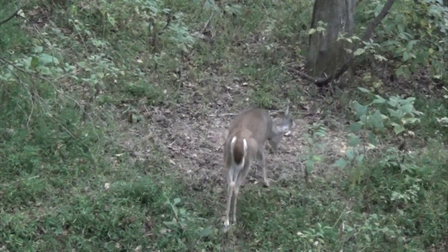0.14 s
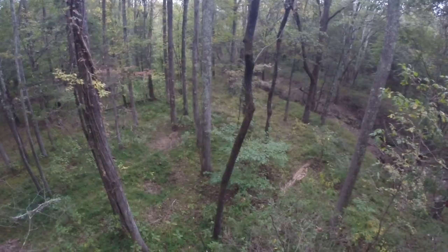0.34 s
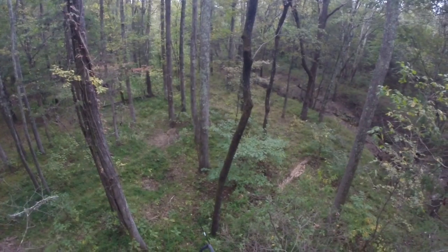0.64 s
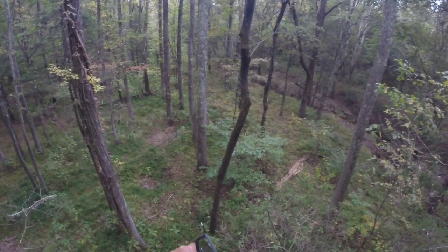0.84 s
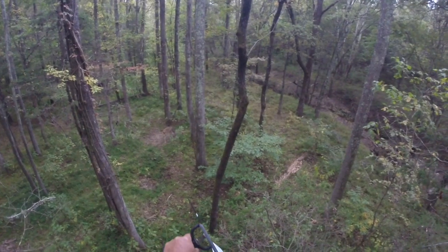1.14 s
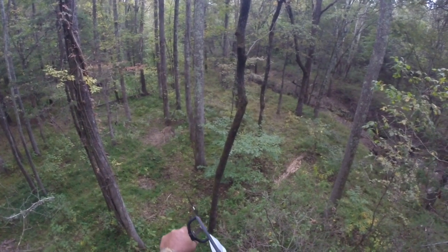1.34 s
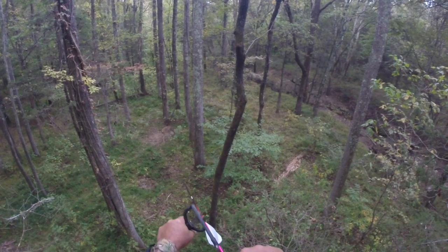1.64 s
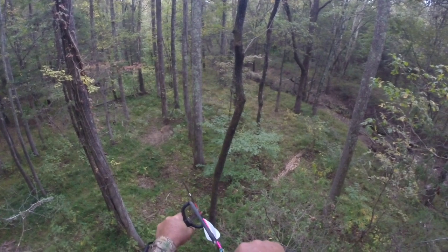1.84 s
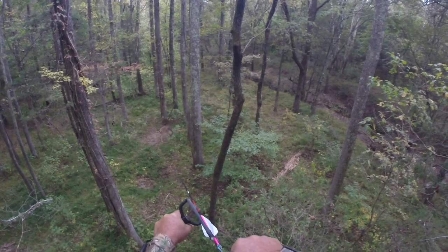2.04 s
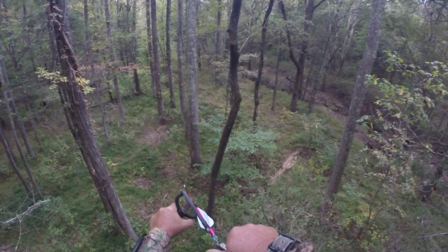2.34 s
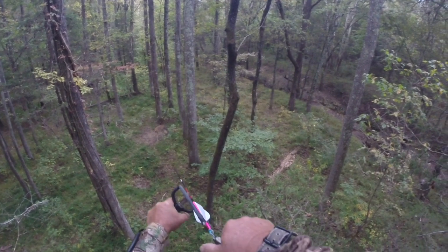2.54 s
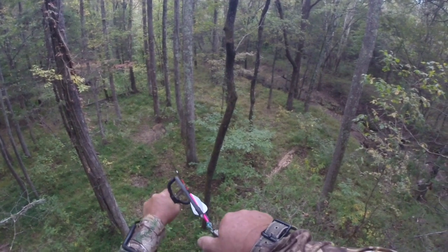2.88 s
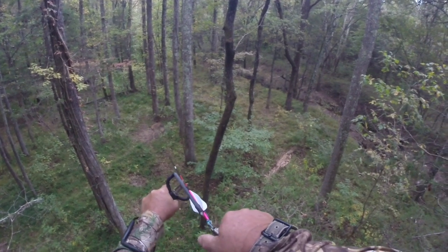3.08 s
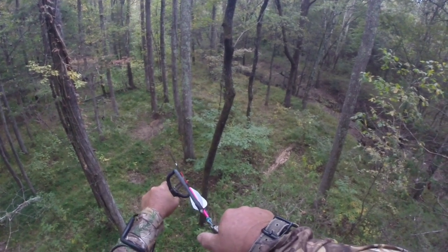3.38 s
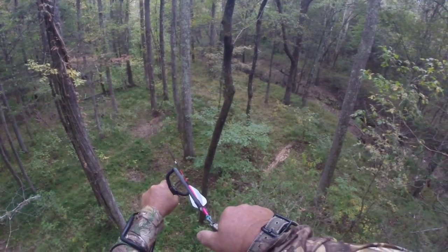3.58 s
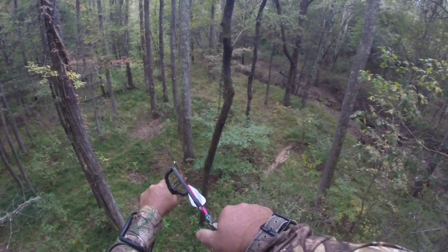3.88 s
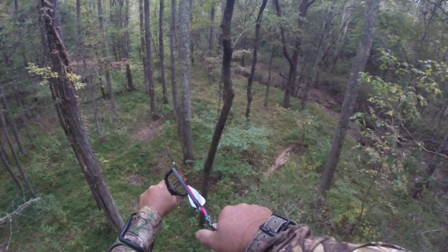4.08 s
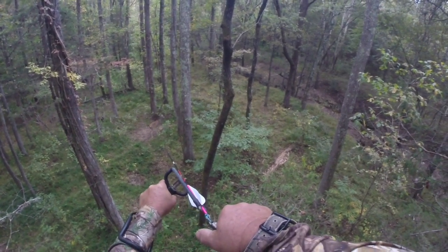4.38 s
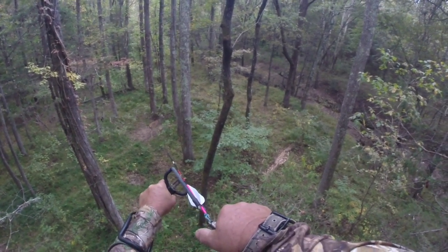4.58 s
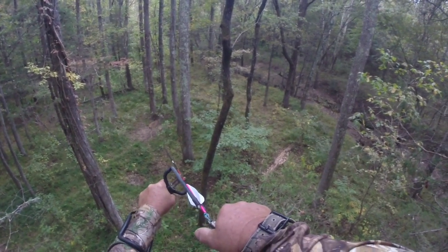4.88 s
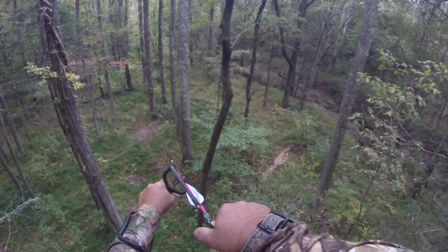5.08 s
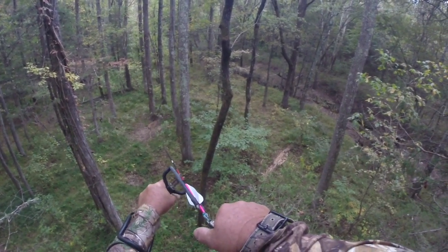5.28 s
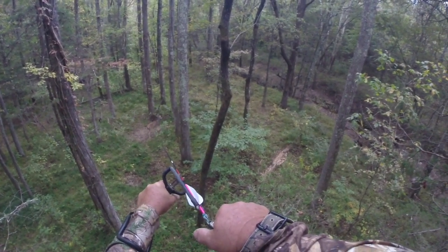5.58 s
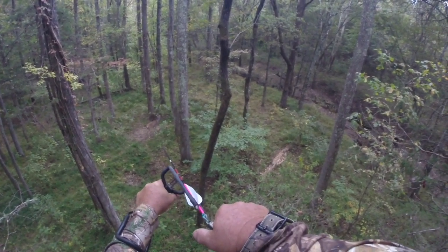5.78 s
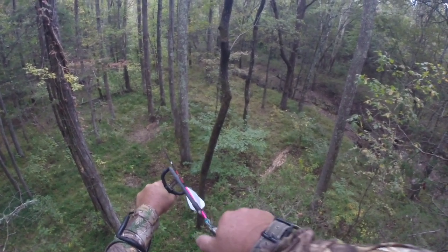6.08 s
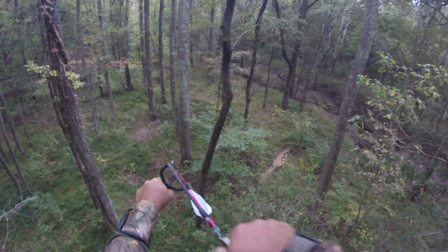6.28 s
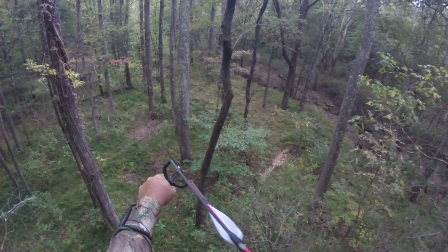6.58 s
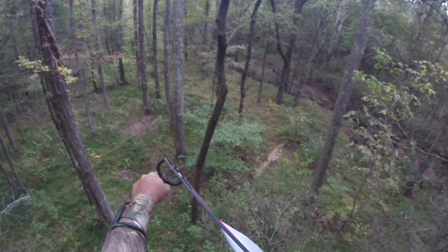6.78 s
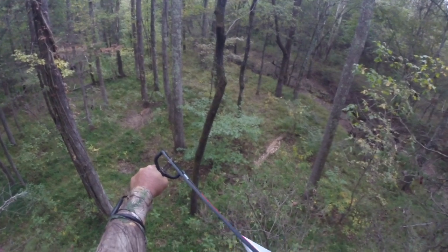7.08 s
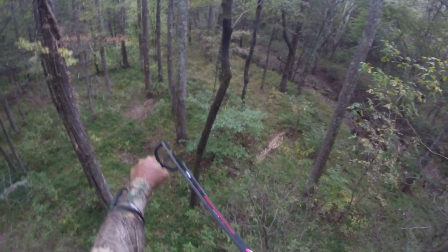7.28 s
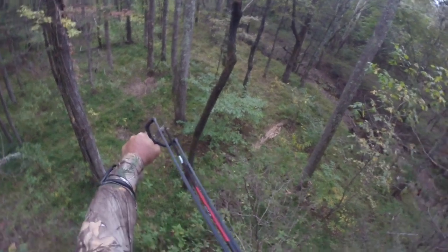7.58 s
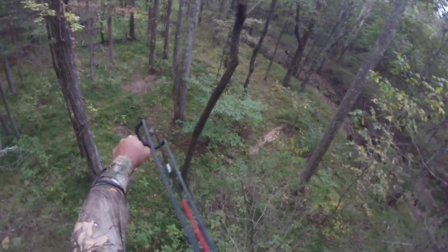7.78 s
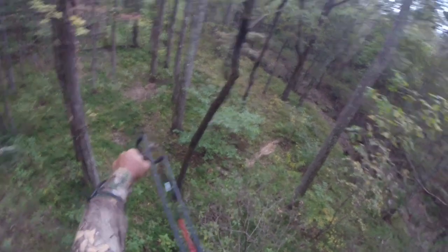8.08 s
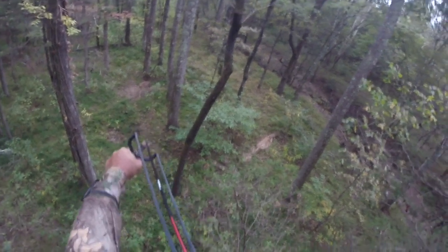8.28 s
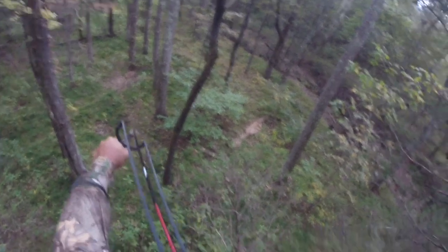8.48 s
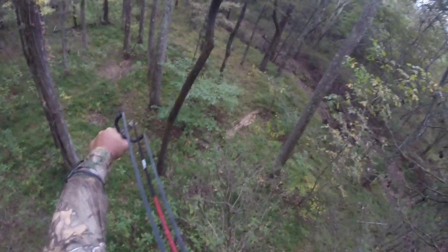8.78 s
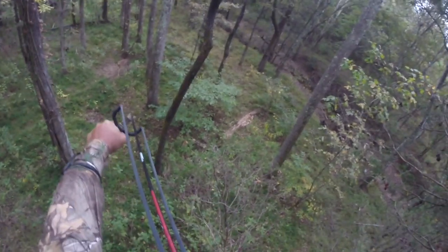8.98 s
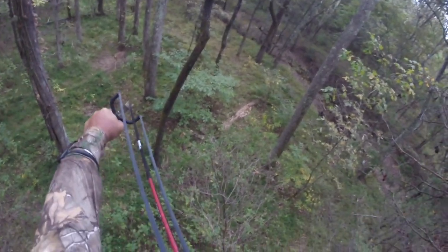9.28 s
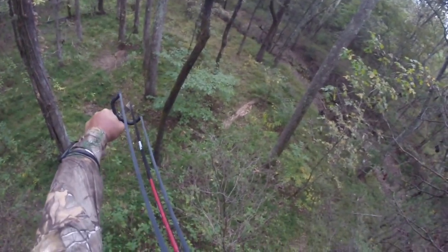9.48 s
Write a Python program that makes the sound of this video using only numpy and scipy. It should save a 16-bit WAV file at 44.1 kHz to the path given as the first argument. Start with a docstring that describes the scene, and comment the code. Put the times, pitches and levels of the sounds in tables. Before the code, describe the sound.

A quarter-second burst of loud insect chorus drops abruptly to quiet woods with faint chirping crickets, then low rumble and soft knocks as a bow is drawn.

```python
"""Autumn woods. For a quarter second a loud stereo chorus of insects, made of throbbing noise bands, wing tones and
rasps, covers a beating far engine drone. It then fades quickly to a quiet mono body-worn microphone up a tree: soft
forest air of shaped noise, two field crickets, a third pipping and others far off, all built from ringing syllables,
faint katydids of throbbing and ticking noise under an unsteady treble hiss, and a far whistled bird. Towards the end
the archer draws a sling bow and the movement comes through the mount as deep noise and low knocks."""
import sys
import numpy as np
from scipy import signal
from scipy.fft import rfft, irfft, next_fast_len
from scipy.io import wavfile
from scipy.ndimage import uniform_filter1d

SR = 44100
rng = np.random.default_rng(int(sys.argv[2]) if len(sys.argv) > 2 else 0)


def transcribe(signal):
    """Save signal, clipped to [-1, 1], as a 16-bit WAV file at the path in sys.argv[1]."""
    frames = np.atleast_2d(signal).T
    limited = np.clip(frames, -1, 1)
    pcm = np.round(limited * 32767).astype(np.int16)
    wavfile.write(sys.argv[1], SR, pcm)


N = 425124
TIME = np.arange(N) / SR
CUT_S, FADE_S = 0.2495, 0.014   # start and length of the fade from chorus to woods


def from_db(db):
    """Decibels to gain."""
    return 10 ** (np.asarray(db) / 20)


def rms_one(x):
    """Scale to unit power."""
    return x / np.sqrt(np.mean(x ** 2) + 1e-20)


def level(rows):
    """Gain along a curve of (s, dB)."""
    return from_db(np.interp(TIME, *np.transpose(rows)))


def at_hz(points, hz):
    """Read a curve on a log-frequency axis."""
    f, value = np.transpose(points)
    return np.interp(np.log(hz + 1e-9), np.log(f), value)


def noise(shape):
    """Noise of unit power, coloured by the gain shape(hz)."""
    size = next_fast_len(N)
    hz = np.arange(size // 2 + 1) * SR / size
    spectrum = rfft(rng.standard_normal(size)) * shape(hz)
    return rms_one(irfft(spectrum, size)[:N])


def drift(rate):
    """Slow random wander of unit power, mostly below rate in Hz."""
    return noise(lambda f: 1 / (1 + (f / rate) ** 2))


def band(hz, width):
    """Noise in a resonance with sloping skirts."""
    return noise(lambda f: 1 / np.sqrt(1 + (2 * (f - hz) / width) ** 4))


def swell(centre, length):
    """A smooth rise and fall of height 1."""
    out = np.zeros(N)
    a, b = np.searchsorted(TIME, [centre - length / 2, centre + length / 2])
    out[a:b] = np.cos(np.pi * (TIME[a:b] - centre) / length) ** 2
    return out


def add(out, s, sound):
    """Mix a short sound in at time s."""
    i = int(np.clip(round(s * SR), 0, N))
    out[i:i + len(sound)] += sound[:N - i]


def low_pass(x, hz):
    """Steep top cut."""
    return signal.sosfilt(signal.ellip(12, .1, 70, hz, fs=SR, output="sos"), x)


def strokes(per_s, depth_db, unsteady):
    """Throb, as of wings opening and closing, at a wandering rate; depth is the rms swing of the level."""
    rate = per_s * (1 + unsteady * drift(12.0))
    phase = 2 * np.pi * np.cumsum(rate) / SR
    return rms_one(from_db(np.sqrt(2) * depth_db * np.sin(phase)))


def syllable(hz, length, rise_hz, arch_hz):
    """One wing closure: the file's speed bends the pitch of the ringing wing."""
    u = np.linspace(-1, 1, int(length * SR))   # from start to end of the closure
    pitch = hz + rise_hz * u - arch_hz * u ** 2 + rng.normal(0, 19)
    envelope = np.sqrt(1 - u ** 2) * np.cos(u)
    return envelope * np.sin(2 * np.pi * (np.cumsum(pitch) / SR + rng.random()))


def trees(x, wet_db, t60):
    """Trunks and leaves scatter a thin dying tail."""
    t = TIME[:SR // 2]
    tail = rng.standard_normal(len(t)) * from_db(-60 * t / t60) * (t > .003)
    echo = signal.fftconvolve(x, tail / np.linalg.norm(tail))[:N]
    return x + from_db(wet_db) * echo


def stereo(mid, side, likeness):
    """Two unrelated sounds make a pair of the given likeness."""
    alike = np.clip(likeness, -1, 1)
    return np.sqrt((1 + alike) / 2) * mid + np.sqrt((1 - alike) / 2) * side * np.array([[1], [-1]])


def opening_air():
    """Broad air noise, alike in both ears or spread apart according to frequency."""
    # Colour of the air. Each row: frequency in Hz, relative density in dB per Hz.
    colour = [(25, -19), (60, -13), (115, -0.5), (220, -2), (350, -10), (700, -14), (1400, -17.5),
              (3800, -19), (8000, -14), (10400, -15), (11500, -22), (15500, -23.5)]
    # Stereo width of the air. Each row: frequency in Hz, left-right likeness from 0 to 1.
    likeness = [(130, 0.986), (290, 0.81), (640, .08), (1400, .02), (3100, .45), (7000, 1), (12000, 1)]

    def side_gain(f):
        alike = np.clip(at_hz(likeness, f), 0, 1)
        return from_db(at_hz(colour, f)) * np.sqrt((1 - alike) / (1 + alike))

    mid = noise(lambda f: from_db(at_hz(colour, f)))
    side = noise(side_gain)
    return from_db(-43.5) * mid + from_db(-52.0) * side * np.array([[1], [-1]])


def engine():
    """A far drone that swells and sinks in slow beats while its pitch wavers."""
    drone_hz, peak_db, beat_s = 161.5, -42, 0.144
    beats = np.abs(np.sin(np.pi * TIME / beat_s))
    pitch = drone_hz + 1.5 * drift(13.7)
    return from_db(peak_db) * beats * np.sin(2 * np.pi * np.cumsum(pitch) / SR)


def trillers():
    """Steady trilling crickets: near-pure wing tones throbbing at their syllable rates."""
    # One cricket each row: pitch in Hz, rms level in dB, syllables per second.
    trills = [(2960, -62, 45), (4570, -51.5, 61), (4940, -51.5, 52), (4960, -53, 43), (5650, -61, 60)]
    out = 0
    for hz, db, per_s in trills:
        pitch = hz + 10 * drift(30)
        tone = np.sqrt(2) * np.sin(2 * np.pi * np.cumsum(pitch) / SR)
        out = out + from_db(db) * tone * strokes(per_s, 2.9, 0.044)
    return out


def wing_chorus():
    """Massed wings: resonant noise bands, each throbbing at its stroke rate with its own stereo width."""
    # Each row: centre in Hz, width in Hz, level in dB, wing strokes per second,
    # rms throb depth in dB (the sign sets the phase), left-right likeness.
    wing_bands = [(2960, 220, -59, 45, -1, 0.75), (4640, 320, -46.5, 60, -5, 0.55),
                  (5000, 460, -41, 50, 1, 0.82), (5480, 370, -43, 88, 5, 1), (6000, 450, -54.5, 79, 2, .8),
                  (6570, 390, -40, 85, 0.5, 0.88), (6970, 330, -37.5, 88, 1, 0.94),
                  (7330, 530, -46, 36, 9, 0.92)]
    out = 0
    for hz, width, db, per_s, depth_db, likeness in wing_bands:
        wings = band(hz, width)
        # the same noise played backwards is unrelated to it
        out = out + from_db(db) * stereo(wings, wings[::-1], likeness) * strokes(per_s, depth_db, 0.204)
    return out


def rasps():
    """Short falling wing strokes of the nearest katydid, evenly spaced and uneven in strength."""
    first_s, period_s = .0115, 0.023
    pitch_hz, peak_db, spread_db = 6960, -28.5, 2
    out = np.zeros(N)
    for s in np.arange(first_s, CUT_S, period_s):
        gain = from_db(rng.normal(peak_db, spread_db))
        stroke = syllable(rng.normal(pitch_hz, 110), 0.0053, -220, 60)
        add(out, s - .003, gain * stroke)   # the stroke is about centred on s
    return out


def opening():
    """A dense chorus with close rasps and one cricket syllable, over air and a far engine."""
    close = rasps()
    add(close, 0, from_db(-28.5) * syllable(4990, .016, -50, 60))
    insects = trillers() + wing_chorus() + close
    lean_right = from_db([[-.45], [.45]])
    return opening_air() + engine() + insects * lean_right


def forest_air():
    """A smooth wash of far leaves and distance, its level wavering very slightly."""
    # Colour of the air. Each row: frequency in Hz, relative density in dB per Hz.
    colour = [(20, 3.5), (45, 0), (80, -2.5), (160, -5), (300, -8.5), (550, -12), (1000, -16),
              (2000, -20.5), (4000, -26), (6000, -28), (8000, -34.5), (10500, -37.5), (12500, -40.5),
              (15500, -45)]
    wash = noise(lambda f: from_db(at_hz(colour, f)) * f / np.hypot(f, 14))
    return from_db(-55.0) * wash * from_db(0.09 * drift(6.8))


def keenness():
    """Gain of the pipper and the katydid trills as they grow a little keener."""
    calm_db, keen_db = -.5, 1
    start_s, rise_s = 6, 1.6
    return level([(start_s, calm_db), (start_s + rise_s, keen_db)])


def cricket(chirps, period, length, rise_hz, arch_hz, start_db, start_hz, uneven_db):
    """Chirps are trains of uneven syllables; the first ones are offset in level and lower in pitch."""
    out = np.zeros(N)
    for s, count, hz, db in chirps:
        for k in range(int(round(count))):
            onset = np.exp(-2 * k)   # 1 on the first syllable, soon gone
            gain = from_db(db + start_db * onset + rng.normal(0, uneven_db))
            add(out, s + k * period, gain * syllable(hz - start_hz * onset, length, rise_hz, arch_hz))
    return out


def pipper():
    """Single syllables in strict time, each a little different in pitch and strength."""
    first_s, period_s, length_s = .4276, .31286, .017
    pitch_hz, pitch_spread_hz = 5450, 45
    peak_db, spread_db = -64.5, 0.5   # before keenness
    out = np.zeros(N)
    for s in np.arange(first_s, TIME[-1], period_s):
        gain = from_db(rng.normal(peak_db, spread_db))
        add(out, s, gain * syllable(rng.normal(pitch_hz, pitch_spread_hz), length_s, -23, 15))
    return out * keenness()


def crickets():
    """Two chirping neighbours, one steady pipper and chirps from far off that come with more echo."""
    # Three singers: arched syllables, rising syllables, and far chirps blurred by the trees.
    # Each row: start in seconds, number of syllables, pitch in Hz, nominal peak level in dB.
    arched_chirps = [(.258, 10, 4960, -58), (1.585, 10, 5030, -57.5), (3.047, 10, 4950, -57.5),
                     (4.795, 10, 4990, -56.5), (6.450, 10, 5000, -59), (7.686, 10, 5000, -58),
                     (9.025, 10, 4965, -59.5)]
    rising_chirps = [(.960, 11, 4760, -58), (2.558, 11, 4760, -58), (4.212, 9, 4800, -58.5),
                     (6.524, 10, 4750, -59), (8.234, 11, 4750, -58.5)]
    far_chirps = [(0.799, 11, 4980, -62), (1.97, 11, 4900, -71), (3.262, 13, 5050, -64),
                  (3.889, 11, 4940, -67), (5.28, 10, 5050, -68), (5.5, 11, 5100, -67),
                  (6.847, 12, 4960, -66.5), (7.149, 12, 4880, -70), (7.357, 12, 5060, -66),
                  (7.9, 14, 4710, -73), (8.912, 10, 5030, -65), (9.276, 11, 4970, -67)]
    arched = cricket(arched_chirps, period=.0187, length=0.012, rise_hz=-35, arch_hz=100,
                     start_db=-2.0, start_hz=70, uneven_db=0.7)
    rising = cricket(rising_chirps, period=.0201, length=0.011, rise_hz=140, arch_hz=-30,
                     start_db=-2.5, start_hz=70, uneven_db=1.2)
    far = cricket(far_chirps, period=.0194, length=0.014, rise_hz=-92, arch_hz=40,
                  start_db=1, start_hz=20, uneven_db=2.0)
    near = arched + rising + pipper()
    return trees(near, wet_db=-8, t60=0.25) + trees(far, wet_db=-3, t60=.2)


def tick_rows():
    """The clear ticks, and weaker ones at random wherever the wings have had their rest."""
    # Clearest ticks of a high katydid. Each row: time in seconds, nominal peak level in dB.
    clear_ticks = [(1.1751, -63), (2.2811, -64), (2.4058, -62), (3.7806, -63), (4.281, -64), (5.5322, -65),
                   (6.1797, -61), (6.2855, -63), (6.4635, -60), (7.807, -62), (8.2435, -60), (8.3453, -62),
                   (8.4989, -62), (9.585, -60)]
    tries_per_s, weak_db, rest_s = 9.4, -65, .07
    rows = list(clear_ticks)
    for s in rng.uniform(CUT_S, TIME[-1], int(tries_per_s * TIME[-1])):
        if all(abs(s - other) > rest_s for other, db in rows):
            rows.append((s, weak_db))
    return rows


def katydids():
    """Far trills merge into throbbing bands; a nearer one ticks; over them lies a faint, unsteady top-treble hiss."""
    # Far insects. Each row: centre in Hz, width in Hz, level in dB before keenness,
    # wing strokes per second, rms throb depth in dB (the sign sets the phase).
    far_insects = [(5030, 533, -74, 52, -0.5), (5490, 290, -80, 37, 0.5), (6770, 790, -77, 37, 1),
                   (8450, 800, -95, 20, 7.5), (10250, 400, -88, 88, 10)]
    # Top-treble hiss. Each row: centre in Hz, width in Hz, level in dB before its unsteadiness.
    treble_bands = [(13300, 300, -82.5), (14700, 1300, -85)]
    trills = sum(from_db(db) * band(hz, width) * strokes(per_s, depth_db, 0.0089)
                 for hz, width, db, per_s, depth_db in far_insects)
    rows = tick_rows()
    unsteady = np.minimum(sum(swell(s + 0.027, 0.085) for s, db in rows), 1) ** .25
    treble = sum(from_db(db) * band(hz, width) for hz, width, db in treble_bands)
    treble_hiss = treble * (unsteady + .1) * strokes(105, 2, .05)
    # the noise peaks above its rms, so each tick is turned down by 4.5 dB
    tick_gain = sum(from_db(db - 4.5) * swell(s + .001, 0.0056) for s, db in rows)
    return trills * keenness() + treble_hiss + tick_gain * band(8800, 1100)


def bird():
    """A very distant bird: a few thin whistled notes, mostly echo."""
    # Each row: start in seconds, length in seconds, pitch in Hz, peak level in dB before the echo.
    whistles = [(0.59, 0.05, 3060, -71), (5.35, 0.08, 2948, -72.5), (5.43, .09, 3050, -74),
                (5.804, 0.15, 2950, -74.5)]
    notes = np.zeros(N)
    for s, length, hz, db in whistles:
        add(notes, s, from_db(db) * syllable(hz, length, 30, 42.3))
    return trees(notes, wet_db=1, t60=.3)


def draw_effort():
    """Gain of the shaking: it grows with the pull, holds at full draw, and eases off."""
    start_s, full_draw_s, hold_s = 5.8, 7.7, 0.88
    full_draw_db, strain_db_per_s, settle_db_per_s = -44, 9, 6
    strain_db = strain_db_per_s * np.minimum(TIME - full_draw_s, 0)
    settle_db = settle_db_per_s * np.maximum(TIME - full_draw_s - hold_s, 0)
    fade_in = np.clip((TIME - start_s) / .5, 0, 1)
    return from_db(full_draw_db + strain_db - settle_db) * fade_in


def mount():
    """Drawing the bands shakes the microphone: an even, deep rumble and a few soft knocks."""
    # Colour of the rumble. Each row: frequency in Hz, relative density in dB per Hz.
    colour = [(12, 3.5), (33, -1.5), (48, -5), (70, -14.5), (110, -23), (200, -28), (500, -64)]
    # Soft knocks and jolts. Each row: centre in seconds, pitch in Hz, peak level in dB, length in seconds.
    bumps = [(6.842, 28, -45, 0.14), (7.703, 26, -34, 0.068), (8.013, 102, -36, 0.043),
             (8.019, 54.7, -38, .09), (8.28, 28, -36, 0.082), (8.494, 29.8, -36, 0.11),
             (8.652, 24.4, -42, 0.22)]
    shake = noise(lambda f: from_db(at_hz(colour, f)) * f / np.hypot(f, 10) / (1 + (f / 600) ** 2))
    local_power = uniform_filter1d(shake ** 2, SR // 12)
    rumble = rms_one(shake / np.sqrt(local_power + .05))   # evens out the loudness
    knocks = sum(from_db(db) * swell(s, length) * -np.cos(2 * np.pi * hz * (TIME - s - .01))
                 for s, hz, db, length in bumps)
    return draw_effort() * rumble + knocks


def scene():
    """The loud stereo opening gives way to the quiet mono woods, whose top is cut a little lower."""
    woods = low_pass(forest_air() + crickets() + katydids() + bird() + mount(), 15300)
    after = np.clip((TIME - CUT_S) / FADE_S, 0, 1)
    return (1 - after) * opening() + after * woods


def record(dry):
    """The top is cut steeply at 15.8 kHz."""
    return low_pass(dry, 15800)


dry = scene()
out = record(dry)
transcribe(out)
```